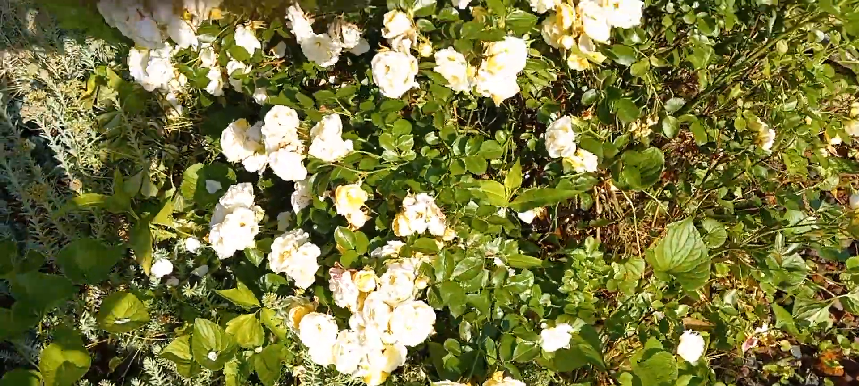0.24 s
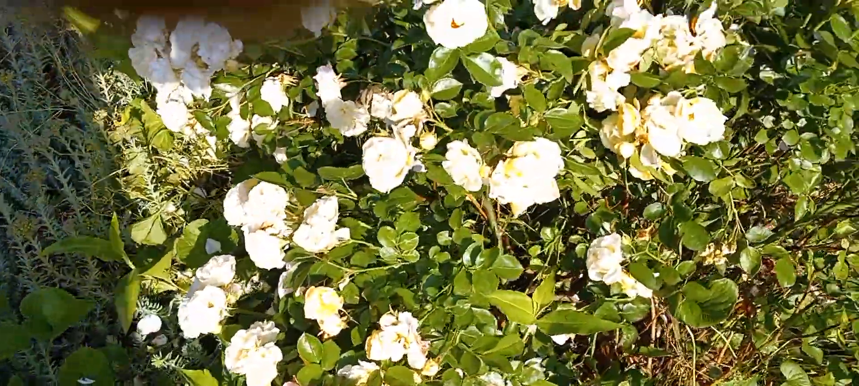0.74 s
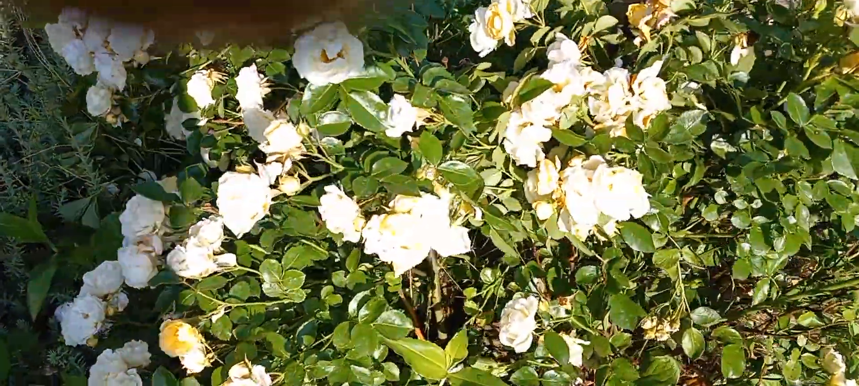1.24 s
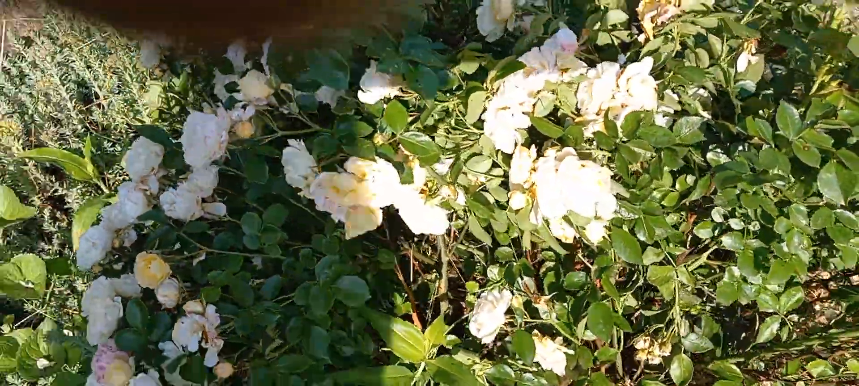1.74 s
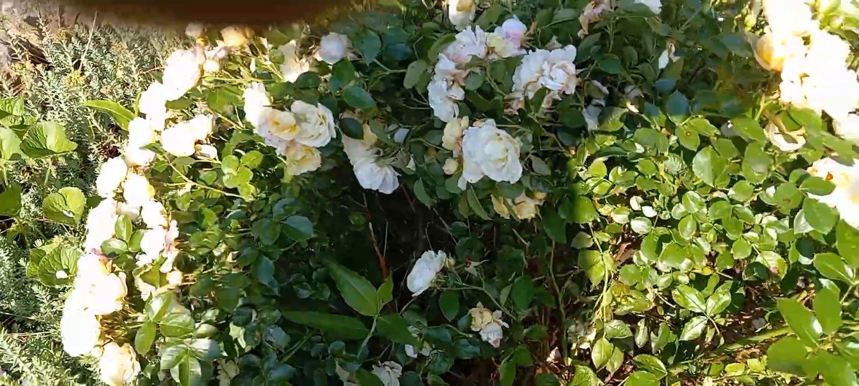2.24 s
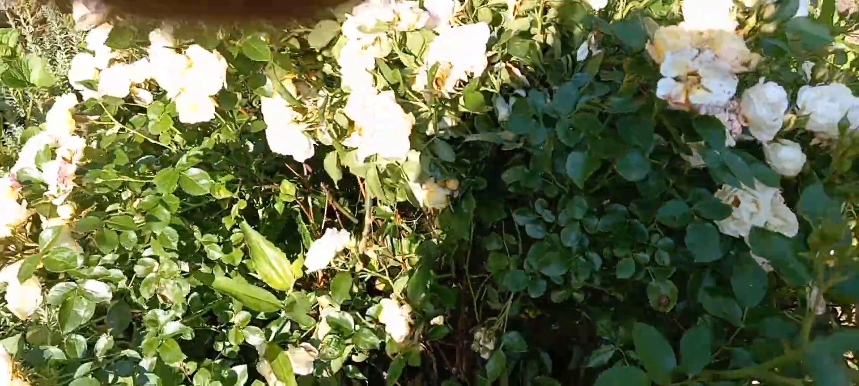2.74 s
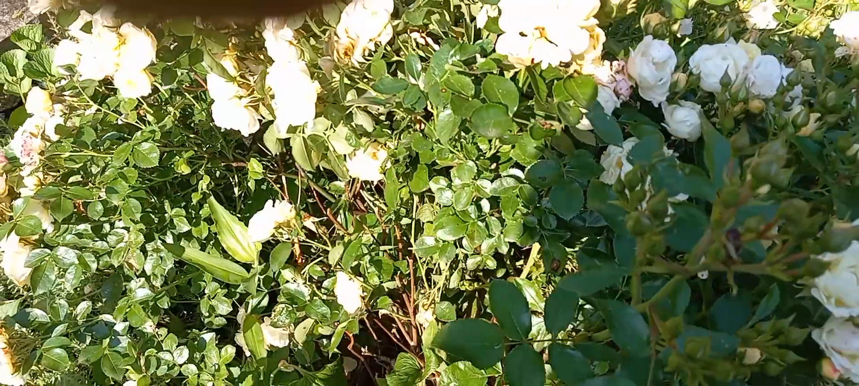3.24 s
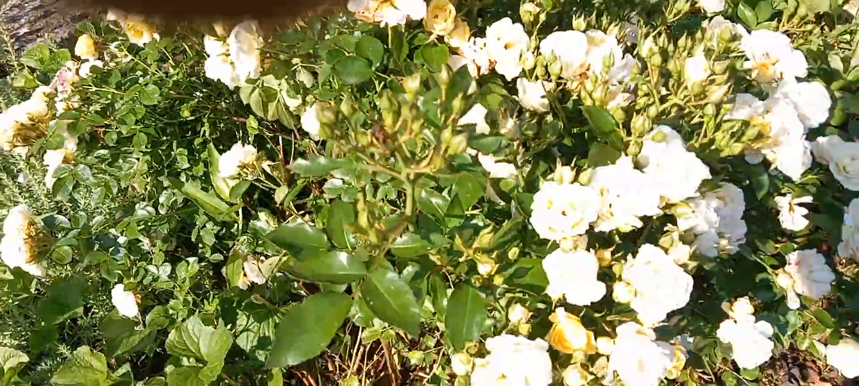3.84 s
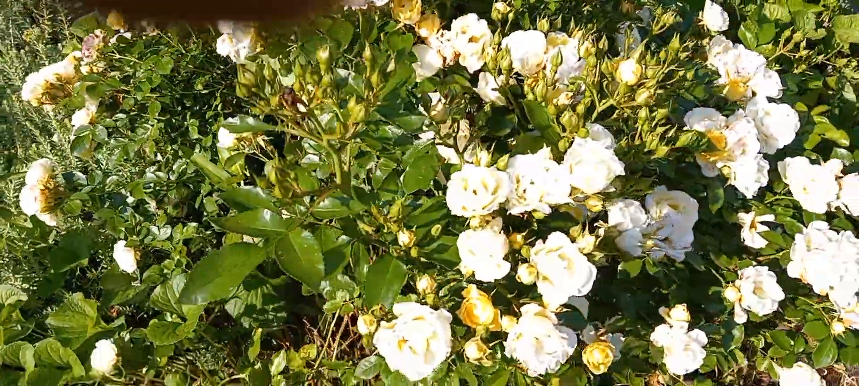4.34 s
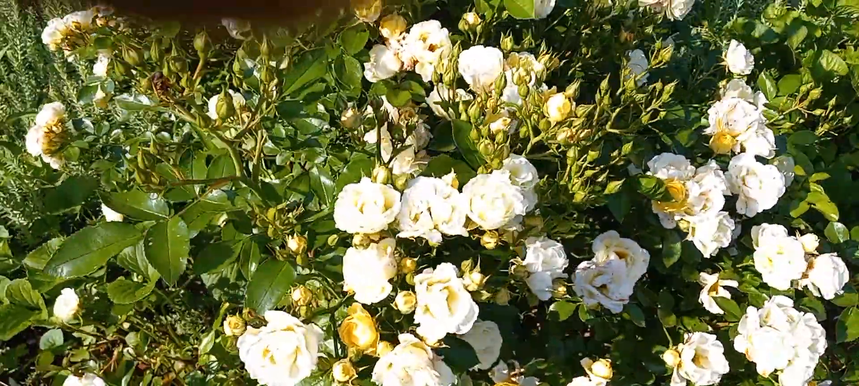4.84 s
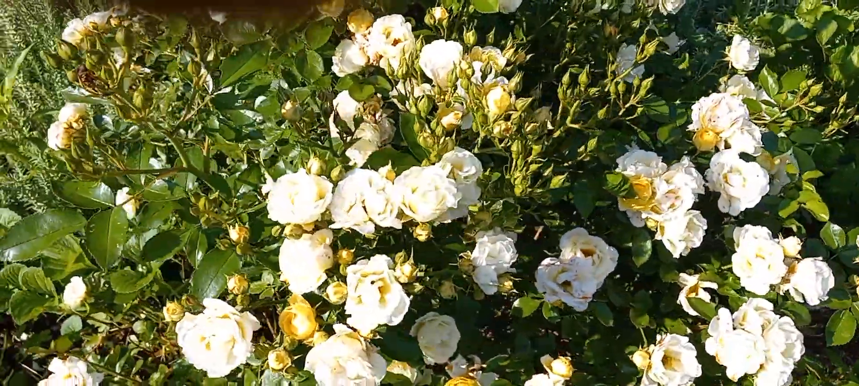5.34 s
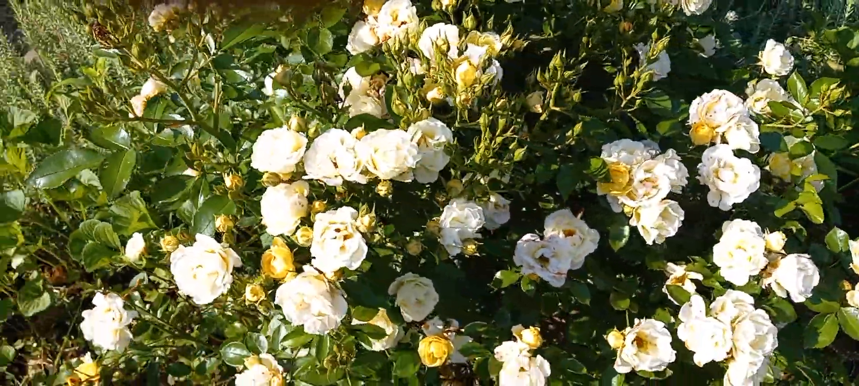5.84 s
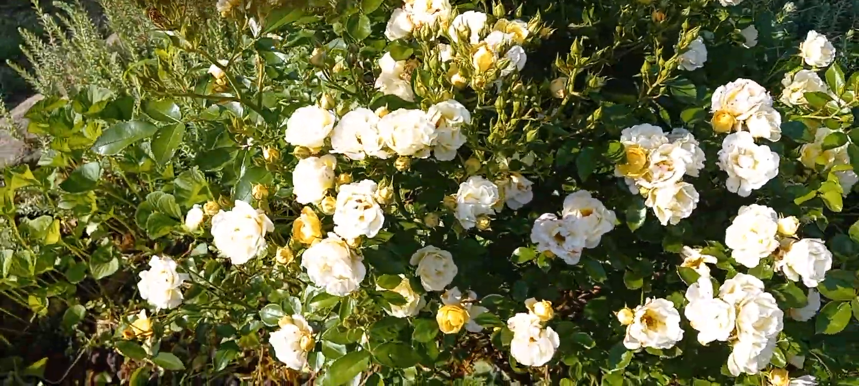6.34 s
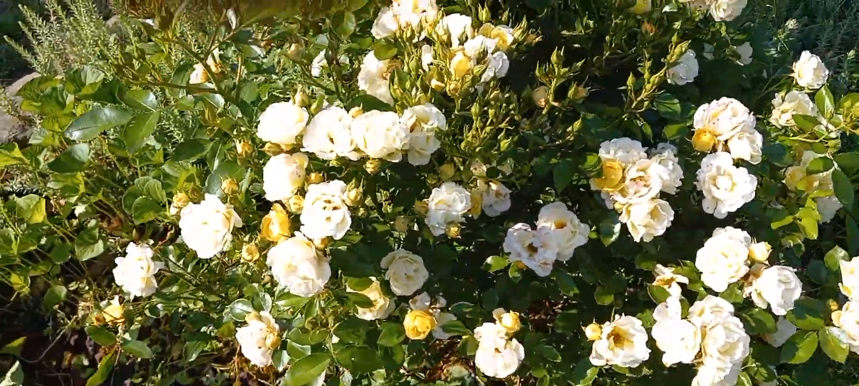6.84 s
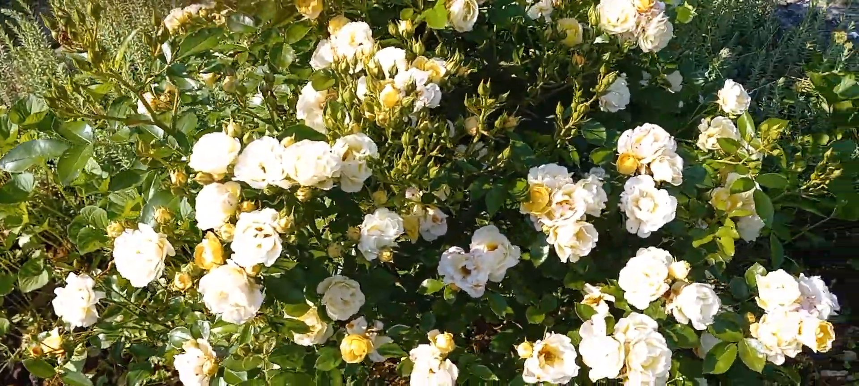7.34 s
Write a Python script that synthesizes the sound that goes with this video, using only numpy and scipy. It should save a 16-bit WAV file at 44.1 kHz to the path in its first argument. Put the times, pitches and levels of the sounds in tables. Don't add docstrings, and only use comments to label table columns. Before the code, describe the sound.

A songbird whistles quick high two-note phrases in a breezy garden while low wind thumps the microphone and grass rustles and snaps underfoot.

```python
import sys
import numpy as np
from scipy import signal
from scipy.fft import rfft, irfft, next_fast_len
from scipy.io import wavfile
from scipy.ndimage import uniform_filter1d

SR = 44100
rng = np.random.default_rng(int(sys.argv[2]) if len(sys.argv) > 2 else 0)


def master_out(mix):
    frames = np.transpose(np.atleast_2d(mix))
    ceiling = np.clip(frames, -1, 1)
    pcm = np.round(ceiling * 32767).astype(np.int16)
    wavfile.write(sys.argv[1], SR, pcm)


def gain_from_db(level_db):
    decades = np.asarray(level_db, float) / 20
    return 10 ** decades


N = 334719


def rms_one(x):
    return x / np.sqrt(np.mean(x ** 2) + 1e-20)


def in_time(rows):
    s, *columns = np.transpose(rows)
    return [np.interp(np.arange(N) / SR, s, c) for c in columns]


def at_hz(points, hz):
    point_hz, point_db = np.transpose(points)
    return np.interp(np.log(hz), np.log(point_hz), point_db)


def sides(pan_db):
    pair = np.array([gain_from_db(pan_db / 2), gain_from_db(-pan_db / 2)])
    return pair * np.sqrt(2 / np.sum(pair ** 2, axis=0))


def drift(rate, channels=1):
    hop, settle = 40, 2000
    r = np.exp(-2 * hop * np.pi * rate / SR)
    white = rng.standard_normal((channels, N // hop + settle + 2))
    slow = signal.lfilter([1], [1, -2 * r, r * r], white)[:, settle:]
    return np.array([np.interp(np.arange(N) / hop, np.arange(len(s)), rms_one(s)) for s in slow])


def coloured(white, spectrum):
    size = next_fast_len(N)
    hz = np.maximum(np.arange(size // 2 + 1) * SR / size, 1)
    (low_hz, low_db), (high_hz, high_db) = spectrum[0], spectrum[-1]
    closed = [(low_hz / 2, low_db - 30), *spectrum, (high_hz * 1.3, high_db - 30)]
    return rms_one(irfft(rfft(white, size) * gain_from_db(at_hz(closed, hz)), size)[..., :N])


def resonance(x, hz, width_hz):
    r = np.exp(-np.pi * width_hz / SR)
    return signal.lfilter(np.array([1, 0, -1]) * (1 - r * r) / 2, [1, -2 * r * np.cos(2 * np.pi * hz / SR), r * r], x)


def left_late(x, lag_ms):
    now = np.arange(N)
    return np.array([np.interp(now - lag_ms * SR / 1000, now, x), x])


def from_afar(three, alike, lag_ms):
    return np.sqrt(alike) * left_late(three[0], lag_ms) + np.sqrt(1 - alike) * three[1:]


def add(out, s, sound):
    at = round(s * SR)
    out[:, at:at + sound.shape[1]] += sound


def burst(noise, ring_ms, hz, width_hz, rise_ms=0.059):
    ms = np.arange(len(noise)) * 1000 / SR
    kicked = noise + 2.6 * (ms < .05)
    dying = kicked * np.exp(-ms / ring_ms) * np.clip(ms / rise_ms, 0, 1)
    hit = resonance(resonance(dying, hz, width_hz), 0.42 * hz, 2 * width_hz)
    return hit / np.max(np.abs(hit))


def swells(floor_db, peaks_s, peaks_db, pans_db, widths_s, edge, linger):
    t = np.arange(0, N + 160, 160) / SR
    away = (t - peaks_s[:, None]) / widths_s[:, None]
    fade_db = 10 * np.where(away > 0, away / linger, -away) ** edge
    each = gain_from_db(peaks_db[:, None] - fade_db) * sides(pans_db)[..., None]
    gain = np.sqrt(np.sum(each ** 2, axis=1))
    return np.hypot([np.interp(np.arange(N) / SR, t, g) for g in gain], gain_from_db(floor_db))


def garden(x):
    hedge_s, wall_s, t60_s = 0.027, 0.106, 0.89
    t = np.arange(round(1.2 * SR)) / SR
    sparse = rng.standard_normal((2, len(t))) * (rng.random((2, len(t))) < .01)
    wall = 0.45 * np.exp(-((t - wall_s) / 0.014) ** 2)
    hedge = 0.7 * np.exp(-((t - hedge_s) / 0.008) ** 2)
    foliage = gain_from_db(-60 * t / t60_s) * np.clip(t / 0.008, 0, 1)
    echoes = sparse * (foliage + wall + hedge)
    echoes = echoes / np.sqrt(np.sum(echoes ** 2, axis=1, keepdims=True))
    return signal.fftconvolve(x[None], echoes, axes=1)[:, :N]


def bird(lag_ms):
    # start in seconds, direct level in dB, start pitch in Hz, end pitch in Hz, echo in dB
    rising_notes = [
        (.116, -48, 2510, 2590, -55),
        (.443, -48.5, 2475, 2565, -56),
        (2.105, -56, 2540, 2670, -55),
        (2.431, -49.5, 2520, 2660, -52),
        (2.760, -57, 2510, 2670, -51),
        (4.901, -47, 2530, 2695, -52),
        (5.223, -47, 2485, 2685, -53),
        (5.547, -46, 2485, 2625, -52.5),
    ]
    falling_notes = [
        (0, -54, 2205, 1930, -55),
        (.328, -67, 2175, 1930, -58),
        (2.313, -54, 2235, 1930, -60),
        (2.641, -55, 2230, 1930, -63),
        (5.111, -55, 2215, 1930, -62),
        (5.433, -55, 2225, 1930, -59),
    ]
    # seconds after its start, share of the way from start to end pitch, level in dB
    rising_shape = [(0, 1.35, -18), (.006, .5, -10), (.013, 0, -3), (.06, .46, 0), (.1, 1, -1),
                    (.113, 1.05, -26)]
    falling_shape = [(0, 0, -30), (.01, 0, -3), (.05, .06, 0), (.066, .15, -2), (.07, .6, -14),
                     (.077, .7, -3), (.092, .92, -6), (.1, 1.1, -30)]
    # lean from start to end in dB, swell before the middle in dB,
    # delay of a clear echo in seconds, its level in dB
    rising_accents = [(-6, 4, .104, -7), (-8, -5, .058, -10), (8, -1, .03, -9), (-4, -5, .05, -5),
                      (0, -3, .03, 2), (6, -2, .06, -13), (0, -9, .055, -10), (-5, -1, .05, -13)]
    falling_accents = [(4, -5, .035, 0), (0, -3, .055, 6), (-2, 0, .082, -2), (2, -2, .02, -6),
                       (3, 0, .06, -12), (-5, 0, .045, -5)]
    # time in seconds, left-right difference in dB
    bird_side = [(0, 10), (2.3, 7), (2.8, -11), (4.9, -7), (5.6, 0)]
    song_db, echoes_db = 1.3, 3
    direct, clear, sent = np.zeros((3, N))
    wobble_hz = 11 * drift(40)[0]
    kinds = ((rising_notes, rising_accents, rising_shape), (falling_notes, falling_accents, falling_shape))
    for notes, accents, shape in kinds:
        when, share, shape_db = np.transpose(shape)
        t = np.arange(round(when[-1] * SR)) / SR
        part = t / t[-1]
        glide = np.interp(t, when, share)
        for note, accent in zip(notes, accents):
            s, direct_db, start_hz, end_hz, echo_db = note
            lean_db, sag_db, later_s, clear_db = accent
            at = round(s * SR)
            hz = start_hz + (end_hz - start_hz) * glide + wobble_hz[at:][:len(t)]
            accent_db = lean_db * (part - .5) + sag_db * np.exp(-((part - .38) / .14) ** 2)
            loudness = gain_from_db(np.interp(t, when, shape_db) + accent_db)
            tone = np.sqrt(2) * loudness * np.sin(2 * np.pi * np.cumsum(hz) / SR)
            direct[at:at + len(t)] += gain_from_db(song_db + direct_db) * tone
            lost_db = min(end_hz - start_hz, 0) / 24 * glide
            clear[round((s + later_s) * SR):][:len(t)] += gain_from_db(song_db + direct_db + clear_db + lost_db) * tone
            sent[at:at + len(t)] += gain_from_db(echoes_db + echo_db) * tone
    shimmer = gain_from_db(2.6 * drift(35, channels=2))
    straight = left_late(direct, lag_ms) * shimmer * sides(in_time(bird_side)[0])
    return straight + clear * shimmer[::-1] + garden(sent)


def wind():
    # peak time in seconds, peak level in dB, milliseconds to lose ten dB
    left_gusts = [(0.154, -30.5, 29), (0.249, -30, 26), (0.302, -30.5, 31), (0.435, -31.5, 54),
                  (1.009, -31, 45), (1.309, -37, 69), (1.388, -43, 38), (1.964, -52, 41), (2.379, -34, 33),
                  (2.443, -25, 40), (2.546, -28, 32), (2.619, -34.5, 35), (2.694, -42, 48),
                  (2.871, -29.5, 22), (2.973, -46.5, 46), (4.073, -47, 54), (4.534, -17.5, 55),
                  (4.633, -26.5, 50), (4.793, -29, 91), (4.982, -30, 35), (5.077, -50, 52),
                  (5.167, -44, 66), (5.336, -51, 69), (5.49, -40.0, 43), (5.61, -53, 63), (6.077, -49, 75),
                  (6.15, -42.5, 59), (6.286, -48, 89), (6.388, -50, 64), (6.448, -44, 66),
                  (6.528, -42.5, 54), (6.658, -47, 92), (7.24, -44.5, 49), (7.338, -43, 26),
                  (7.492, -41, 63)]
    right_gusts = [(0.177, -49, 50), (0.231, -59, 48), (0.345, -42, 37), (0.417, -44, 41), (0.46, -38, 42),
                   (0.56, -45.5, 75), (0.946, -45, 48), (1.039, -47, 90), (1.658, -49.5, 66),
                   (1.751, -45, 25), (2.254, -44, 44), (2.313, -30.5, 17), (2.362, -24.5, 24),
                   (2.612, -39, 44), (2.664, -40.5, 40), (2.764, -43.5, 30), (2.814, -45, 63),
                   (2.934, -30, 20), (3.011, -38, 61), (3.187, -36, 17), (3.776, -45, 69), (4.258, -34, 16),
                   (4.404, -28.5, 91), (4.506, -32, 48), (4.66, -31.5, 39), (4.757, -39, 69),
                   (4.923, -39.5, 42), (5.034, -42.5, 29), (5.084, -48, 71), (5.161, -37, 34),
                   (5.304, -28.5, 20.5), (5.524, -44.5, 84), (5.622, -39, 35), (5.68, -48, 43),
                   (5.721, -59, 37), (5.773, -38.5, 52), (5.943, -35, 40), (6.036, -33, 39),
                   (6.293, -49, 38), (6.39, -42, 55), (6.472, -49, 52), (6.658, -42.5, 74),
                   (6.834, -50.5, 92), (7.133, -56, 40), (7.181, -47, 53), (7.363, -42.5, 90),
                   (7.422, -45, 49), (7.469, -48, 57)]
    # time in seconds, level in dB
    draught = [(0, -49), (0.7, -50.5), (1.5, -54.5), (1.8, -52.5), (2.2, -57.5), (3.3, -50), (3.75, -49.5),
               (4.2, -56), (5.5, -53), (6.25, -48.5), (6.9, -55), (7.1, -48.5), (7.59, -62)]
    # pitch in Hz, level in dB per Hz
    buffet_colour = [(13, -71), (22, -51), (42, -4), (62, -2), (82, 4.5), (115, -5), (201, -21),
                     (258, -25.5), (298, -26.5), (379, -36.5), (520, -48), (680, -51), (1140, -120)]
    slap_colour = [(110, 7.5), (150, 1), (250, -5), (450, -24.5)]
    s, peak_db, width_ms = np.transpose(left_gusts + right_gusts)
    pan_db = np.repeat([60, -60], [len(left_gusts), len(right_gusts)])
    draught_db = in_time(draught)[0] - 3.5 / 2 * np.array([[1], [-1]])
    white = rng.standard_normal((2, N))
    rumble = coloured(white, buffet_colour)
    power = uniform_filter1d(uniform_filter1d(rumble ** 2, size=1500), size=1500)
    rumble = rumble / np.sqrt(power + 0.034)
    eddies = gain_from_db(1.0 * drift(17.5, channels=2))
    width_s = np.clip(width_ms, 22, 120) / 1000
    gain = swells(draught_db, s, peak_db, pan_db, width_s, edge=1.35, linger=1.15)
    slap_gain = gain_from_db(-14) * (gain / gain.max()) ** .9
    slap = slap_gain * coloured(np.roll(white, SR, axis=1), slap_colour)
    return gain_from_db(3.0) * gain * (rms_one(eddies * rumble) + slap)


def grains(per_s, spread_db):
    clicks = (rng.random((3, N)) < per_s / SR) * gain_from_db(spread_db * np.minimum(rng.exponential(1, (3, N)), 5))
    clicks = clicks * rng.choice([-1, 1], (3, N))
    return clicks[0] + 2.7 * clicks[1:]


def steps():
    # peak time in seconds, seconds to lose ten dB, swish level in dB,
    # left-right difference in dB, crunch level in dB
    footfalls = [(0, .04, -70, -7, -63), (.33, .045, -63, 7, -60), (.40, .045, -64, 4, -57),
                 (.52, .09, -72, 2, -64), (.712, .035, -63, 0, -57), (1.06, .1, -76, 4, -67),
                 (1.35, .2, -82, 0, -64), (1.688, .018, -68, 1, -59), (2.205, .035, -63, 8, -63),
                 (2.51, .035, -68, 6, -54), (2.615, .07, -67, 5, -54), (2.78, .1, -72, 1, -70),
                 (3.315, .025, -65, -2, -54), (3.365, .04, -69, 0, -58), (3.95, .12, -75, 7, -76),
                 (4.33, .12, -77, 0, -62), (4.465, .036, -70, -1, -52), (4.76, .045, -72, 7, -61),
                 (4.865, .025, -73, 3, -68), (5.375, .045, -78, -1, -54), (6.0, .16, -78, 3, -62),
                 (6.485, .05, -69, -2, -54), (6.7, .12, -82, -1, -65), (7.415, .03, -75, -3, -56)]
    # time in seconds, level in dB
    stir = [(0, -77), (0.9, -77), (1.55, -83.5), (2.1, -76), (3.2, -81), (4.5, -78.5), (5.2, -83.5),
            (6.6, -81), (7.0, -96), (7.59, -83)]
    # pitch in Hz, level in dB per Hz
    swish_colour = [(2500, -44), (5000, -3), (8000, -2.5), (9700, -10), (11500, -3), (13500, -3),
                    (15800, -4)]
    crunch_colour = [(300, 8.5), (600, -2), (1000, -8), (1600, -1.5), (3000, -9.5), (6000, -18.5)]
    s, width_s, swish_db, pan_db, crunch_db = np.transpose(footfalls)
    brushing = swells(in_time(stir)[0], s, swish_db, pan_db, width_s, edge=1.7, linger=1.15)
    treading = swells(-70.5, s, crunch_db, 0 * pan_db, 1.35 * width_s, edge=1.7, linger=1.15)
    uneven = gain_from_db(1.3 * drift(30, channels=2))
    swish = gain_from_db(7.0) * brushing * uneven[0] * coloured(grains(6000, 3.2), swish_colour)
    crunch = gain_from_db(4.0) * treading * uneven[1] ** 2 * coloured(grains(900, 3.5), crunch_colour)
    return swish + crunch


def garden_air(diffuse):
    # pitch in Hz, level in dB per Hz
    air_colour = [(150, 9), (350, 4), (770, -4), (1500, -5.5), (1900, -1.5), (2400, -8), (2720, -3),
                  (2950, -8.5), (3250, -7), (3900, -15.5), (4760, -14), (6140, -20.5), (6500, -18.5),
                  (7470, -15.5), (9260, -47), (13400, -34), (16000, -72)]
    # centre in Hz, width in Hz, level in dB
    air_peaks = [(993, 56, -80.5), (1943, 34, -75.5), (2460, 59, -69.5), (3420, 310, -79.5),
                 (3730, 21, -75), (4070, 200, -71), (5680, 100, -83.5), (4740, 230, -70), (6780, 80, -80.5)]
    # time in seconds, change of the hiss in dB
    breeze = [(0, 3), (1.2, -2.5), (2.3, 1), (3.6, 0.1), (4.6, 2.5), (5.7, -1), (6.4, 0.2), (7.0, -4),
              (7.59, 0.5)]
    air = gain_from_db(-55 + in_time(breeze)[0]) * coloured(diffuse, air_colour)
    for hz, width_hz, db in air_peaks:
        air = air + gain_from_db(db + 0.5 * drift(5.9)) * rms_one(resonance(diffuse, hz, width_hz))
    return air


def machine_murmur(aimed, low_db, upper_db, hum_hz):
    swell = gain_from_db(1.5 * drift(5))
    low = gain_from_db(low_db + 2.5) * swell * rms_one(resonance(resonance(aimed, 323, 129), 309, 176))
    upper = gain_from_db(upper_db) * rms_one(resonance(resonance(aimed, 593, 130), 530, 230))
    throb_gain = gain_from_db(-57.5 + 0.86 * drift(4.3))
    throb = throb_gain * rms_one(resonance(resonance(aimed, hum_hz / 2, 22), hum_hz / 2, 38))
    return low + upper + throb


def machine_tones(hum_db, whine_db, hum_hz, whine_hz, lag_ms):
    hum_gain = np.sqrt(2) * gain_from_db(hum_db + 3.6 * drift(20.5)[0])
    hum = hum_gain * np.sin(2 * np.pi * np.cumsum(hum_hz + 0.795 * drift(1.96)[0]) / SR)
    flutter = rms_one(signal.lfilter([1], [1, -2 * .992, .992 ** 2], rng.standard_normal((2, 3, N))))
    phase = 2 * np.pi * np.cumsum(whine_hz) / SR
    whine_gain = gain_from_db(whine_db + 1.2 * drift(4.2)[0])
    whine = whine_gain * (flutter[0] * np.cos(phase) + flutter[1] * np.sin(phase))
    return left_late(hum, lag_ms) + from_afar(whine, 0.76, lag_ms)


def surroundings(lag_ms):
    # time in seconds, whine pitch in Hz, share of its low side in view (0-1), whine swell in dB
    far_machine = [(0, 1799, 0.07, 4.5), (0.8, 1788, 0.41, -1), (1.2, 1815, 0.71, -3),
                   (1.31, 1792, 0.76, 3.5), (1.45, 1820, 0.6, -3.5), (2.3, 1802, 0.4, -0.5),
                   (3.0, 1802, 0.72, -0.5), (4.2, 1810, 0.83, -7), (5.0, 1777, 0.81, -0.5),
                   (5.7, 1772, 0.88, 3), (6.3, 1752, 0.91, 1.5), (7.59, 1728, 0.93, -1)]
    hum_hz = 234.6
    whine_hz, in_view, swell_db = in_time(far_machine)

    def seen(hidden_db, full_db):
        return hidden_db + (full_db - hidden_db) * in_view

    white = rng.standard_normal((3, N))
    diffuse, aimed = from_afar(white, 0.17, lag_ms), from_afar(white, 0.99, lag_ms)
    lows = signal.butter(1, 1100, fs=SR)
    diffuse = diffuse + signal.lfilter(*lows, aimed - diffuse)
    air = garden_air(diffuse)
    murmur = machine_murmur(aimed, seen(-73.5, -59.5), seen(-55, -102.5), hum_hz)
    tones = machine_tones(seen(-81.5, -53), seen(-63.5, -59.5) + swell_db, hum_hz, whine_hz, lag_ms)
    return air + murmur + tones


def overtones(lag_ms):
    # multiple of the shaft rate, level in dB
    shaft_lines = [(5.5, -77), (11, -79), (17, -73.5), (26, -82), (29, -85)]
    shaft_hz = 117.93
    t = np.arange(N) / SR
    lines = sum(gain_from_db(db + 0.84 * drift(1.5)[0]) * np.sin(2 * np.pi * k * shaft_hz * t) for k, db in shaft_lines)
    return left_late(np.sqrt(2) * lines, lag_ms)


def snaps():
    # time in seconds, peak level in dB, centre in Hz, left-right difference in dB
    green_stalks = [(0.0064, -40, 3000, -35), (0.0432, -38.5, 4340, -23), (3.298, -43, 6800, -6),
                    (3.3367, -41, 4900, -4), (4.4675, -43, 3120, 2), (4.481, -41, 3320, 6),
                    (4.5543, -49, 3320, -14), (4.808, -41.5, 4040, 2), (4.8689, -42, 4380, 7),
                    (5.002, -49, 3790, 0), (5.08, -45, 4060, 0.0), (5.362, -30, 3150, 9),
                    (5.368, -46, 3180, -1), (5.375, -47, 5810, -15), (5.3838, -36.5, 3060, 12)]
    # time in seconds, body peak in dB, centre in Hz, left-right difference in dB,
    # crack over the body in dB
    dry_blades = [(0.737, -50.5, 4070, -6, -3), (1.6798, -56, 3264, 3, 5), (1.78, -61, 3730, 12, 9),
                  (2.2016, -52, 5380, 3, 0), (2.788, -52.5, 4570, 7, -5), (3.3102, -37.5, 6500, -2, -4),
                  (3.3238, -60, 9000, 0.0, -2), (3.9507, -54, 4160, 6.5, 0), (1.762, -64, 5010, 2, 6),
                  (2.581, -65, 5010, 5, 11), (2.667, -66, 5000, 6, 10), (2.7082, -68, 5050, 4, 8),
                  (2.737, -66, 5000, 3, 8), (3.353, -68, 5000, 0.0, 9), (3.4301, -36.5, 4030, -2, -19),
                  (4.49, -62, 5000, 0, 5), (4.765, -64.5, 4960, 4, 2.5), (4.75, -55, 3710, 3, -11),
                  (5.408, -56, 3740, -3, -2), (7.388, -47, 3730, -11, -15), (7.41, -45, 3500, -1, -17),
                  (1.1169, -74, 5000, 6, 2), (2.1254, -67, 4970, 4, -1), (2.7676, -70, 5040, 4, 1),
                  (2.8569, -68, 5000, 7, 10), (3.4135, -66, 5000, 1, 5), (3.912, -72, 5000, 7, 5),
                  (4.8592, -49, 4800, 4, -16), (5.2784, -70, 5000, -2, 6), (5.542, -71, 5000, 2, 7),
                  (5.8805, -60, 6450, 9, 2), (6.323, -64, 7000, 0, -6), (6.619, -72, 5030, 3, 7),
                  (6.69, -78, 5000, 2, 3)]
    out = np.zeros((2, N))
    stalks = [(*row, -33, 1.4) for row in green_stalks]
    blades = [(*row, 1.8) for row in dry_blades]
    breaks = sorted(stalks + blades)
    for row, noise in zip(breaks, rng.standard_normal((len(breaks), 1024))):
        s, peak_db, hz, pan_db, crack_db, ring_ms = row
        body = gain_from_db(peak_db + 4.5) * burst(noise, ring_ms, hz, 0.94 * hz)
        crack = gain_from_db(peak_db + crack_db + 10.5) * burst(noise, 0.24 * ring_ms, 30500, 3500)
        body = signal.sosfilt(signal.butter(2, min(1.93 * hz, 16000), fs=SR, output="sos"), body)
        snap = body + crack
        scatter = rms_one(noise[::-1]) * np.exp(-np.arange(len(noise)) / (3.0 * SR / 1000))
        tail = gain_from_db(-25) * np.convolve(snap, scatter)[:len(noise)]
        add(out, s, np.outer(sides(pan_db), snap) + np.outer(sides(pan_db / 3), tail) * [[1], [-1]])
    return out


def knocks():
    # time in seconds, peak level in dB, centre in Hz, left-right difference in dB
    dull_knocks = [(0.354, -41.5, 1460, 19), (0.707, -54, 1290, 12), (1.671, -52, 546, -3),
                   (2.521, -53, 548, -5), (2.532, -44.5, 747, 2), (2.605, -40, 1550, 17),
                   (2.681, -45.5, 603, -2), (2.706, -41.5, 613, -2), (3.337, -47, 615, 1),
                   (3.776, -48.5, 880, 1.5), (4.305, -52, 1245, -3), (4.353, -47, 1260, 10),
                   (4.432, -44, 894, 3), (4.444, -48, 540, 0), (4.457, -40.5, 895, 5),
                   (5.287, -50.5, 662, -4), (5.357, -44, 770, 0), (5.415, -47, 1160, 0),
                   (6.02, -43.5, 900, 3), (6.456, -57, 551, -1), (7.423, -43.5, 700, -3),
                   (7.438, -36.5, 714, 0), (7.451, -39.5, 735, -4)]
    out = np.zeros((2, N))
    for (s, peak_db, hz, pan_db), noise in zip(dull_knocks, rng.standard_normal((len(dull_knocks), 1024))):
        knock = gain_from_db(peak_db + 2.8) * burst(noise, 4.9, hz, 0.6 * hz, rise_ms=2.0)
        add(out, s, np.outer(sides(pan_db), knock))
    return out


def grit():
    # time in seconds, peak level in dB, centre in Hz
    crackles = [(.705, -45, 2600), (.715, -50, 2400), (0.721, -45, 1900), (.727, -44, 1500),
                (1.683, -43, 2300), (.0435, -38, 3200), (3.430, -37, 3030), (5.3625, -41, 2400),
                (2.61, -46, 2800), (2.621, -40, 2400), (2.657, -44, 1800), (3.344, -42, 2000),
                (4.297, -51, 5000), (4.437, -44, 3800), (4.444, -42, 2000), (4.45, -38, 1610),
                (4.462, -48, 1800), (4.491, -41, 2500), (4.756, -50, 1500), (4.764, -43, 2200),
                (6.439, -53, 2000), (6.489, -59, 2000), (6.497, -54, 2800), (7.401, -55, 6500),
                (7.428, -52, 7000), (4.785, -60, 22000), (6.517, -62, 24000), (6.587, -62, 22000),
                (2.585, -57, 21000), (2.782, -55, 23000)]
    out = np.zeros((2, N))
    for (s, peak_db, hz), noise in zip(crackles, rng.standard_normal((len(crackles), 2, 1024))):
        ports = (noise[0], noise.sum(axis=0))
        pops = [burst(n, 1.8, hz, 0.51 * hz, rise_ms=0.25) for n in ports]
        add(out, s, gain_from_db(peak_db) * np.array(pops))
    return out


def leaves():
    # peak time in seconds, seconds to lose ten dB, level in dB, left-right difference in dB, centre in Hz
    leaf_brushes = [
        (.325, .04, -53.5, 9, 12800),
        (.39, .04, -58, 7, 12500),
        (2.205, .025, -57, 10, 13800),
        (2.505, .03, -60, 8, 12300),
        (2.625, .02, -63, 8, 13500),
        (3.362, .01, -63, 0, 12000),
        (3.953, .006, -62, 8, 13100),
        (6.49, .035, -69, -1, 14500),
        (7.424, .014, -61, -3, 11200),
    ]
    out = np.zeros((2, N + SR))
    t = np.arange(-4410, 6615) / SR
    noises = rng.standard_normal((len(leaf_brushes), 2, len(t)))
    for (s, width_s, db, pan_db, hz), noise in zip(leaf_brushes, noises):
        fade_db = 10 * (np.where(t > 0, t / 1.3, -t) / width_s) ** 1.7
        band = rms_one(resonance(resonance(noise, hz, 0.23 * hz), hz, 0.24 * hz))
        add(out, s + t[0], gain_from_db(db - fade_db) * sides(pan_db)[:, None] * band)
    return out[:, :N]


def squeak():
    # time in seconds, level in dB, pitch in Hz, length in seconds
    last_squeak = (7.420, -54.5, 3520, .032)
    out = np.zeros((2, N))
    s, level_db, hz, length_s = last_squeak
    t = np.arange(round(length_s * SR)) / SR
    swell = gain_from_db(level_db) * np.sin(np.pi * t / length_s)
    add(out, s, np.outer([1, 1], swell * np.sin(2 * np.pi * (hz + 1800 * t) * t)))
    return out


def scene():
    # time in seconds, delay of the left port in milliseconds
    facing = [(0, 0.52), (2.5, 0.52), (3.3, 0.42), (4.2, 0.33), (5.2, 0.22), (7.59, 0.13)]
    lag_ms, = in_time(facing)
    nature = bird(0.43) + wind()
    grass = steps() + snaps() + knocks() + squeak()
    far = surroundings(lag_ms)
    return nature + grass + far + leaves() + overtones(lag_ms) + grit()


def band_limit(x):
    return signal.sosfilt(signal.butter(12, 16510, fs=SR, output="sos"), x)


def record(dry):
    # centre in Hz, width in Hz, share removed
    housing_dips = [(2830, 230, .62), (9550, 500, .3)]
    dry = signal.sosfilt(signal.butter(4, 52, "high", fs=SR, output="sos"), dry)
    for hz, width_hz, share in housing_dips:
        dry = dry - share * resonance(dry, hz, width_hz)
    mix = signal.sosfilt(signal.ellip(10, .5, 36, 15730, fs=SR, output="sos"), dry)
    return band_limit(mix)


dry = scene()
out = record(dry)
master_out(out)
```